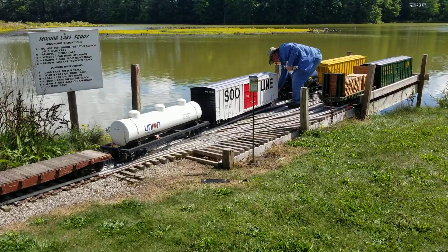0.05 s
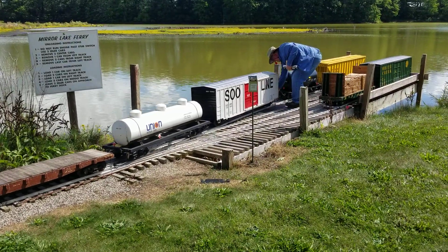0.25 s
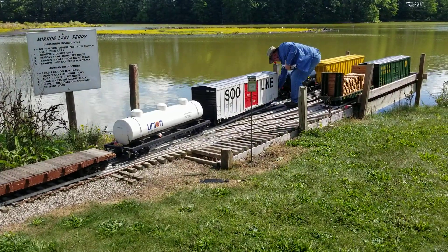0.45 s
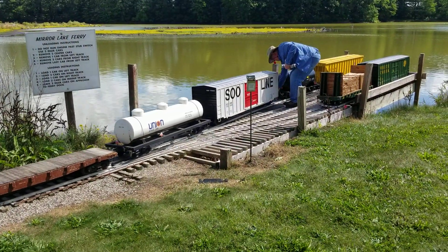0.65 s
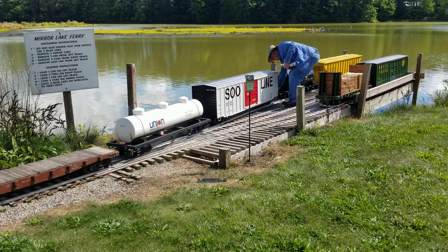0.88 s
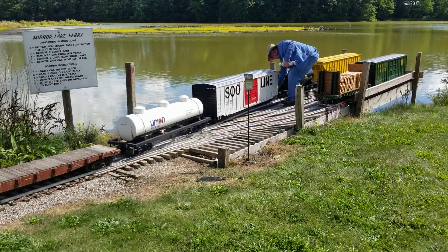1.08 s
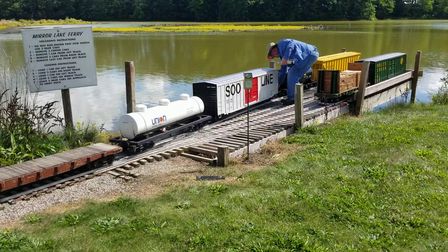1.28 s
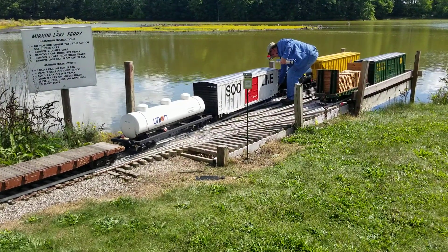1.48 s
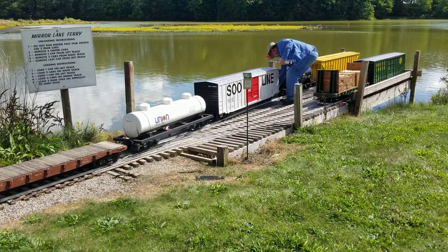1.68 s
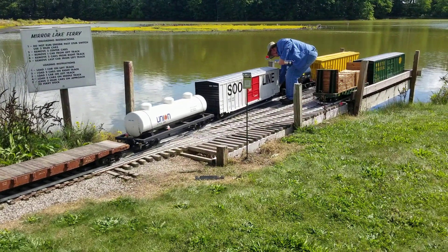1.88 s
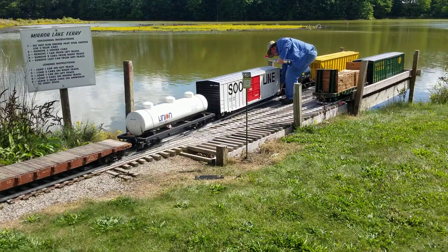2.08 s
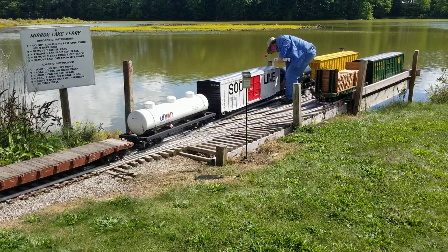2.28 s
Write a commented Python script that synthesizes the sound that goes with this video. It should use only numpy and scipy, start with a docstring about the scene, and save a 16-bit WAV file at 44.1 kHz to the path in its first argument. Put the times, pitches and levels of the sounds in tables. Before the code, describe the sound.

Miniature freight cars knock together in one sharp metallic clack at about 2.15 seconds, with a low thud, a brief steel ring and a short dull tail. Before that, light wind buffets the microphone, with low thumps on the left from 0.3 to 0.7 seconds, then weaker gusts. Leaves and grass rustle faintly throughout, and the creeping wheels grumble very quietly now and then.

```python
"""Miniature freight cars coupling by a lake

Two small cars knock together: a short crush of contacts rings their steel couplers and frames
and thuds through the bodies, with a dull tail off the banks. Their wheels grumble faintly.
A light breeze rustles the trees and grass, and its gusts buffet the two microphone ports."""
import sys
import numpy as np
from scipy import signal
from scipy.fft import rfft, irfft
from scipy.io import wavfile
from scipy.ndimage import uniform_filter1d

SR = 44100
rng = np.random.default_rng(int(sys.argv[2]) if len(sys.argv) > 2 else 0)


def to_wav(s):
    """Save 16-bit WAV."""
    ch = np.atleast_2d(s).T  # columns
    pcm = np.round(np.clip(ch, -1, 1) * 32767)  # PCM
    wavfile.write(sys.argv[1], SR, pcm.astype(np.int16))


N = 108045
T = np.arange(N) / SR
BIN_HZ = np.fft.rfftfreq(N, 1 / SR)
CUTOFF_HZ = 15900

# Stereo image of the open air: freq_hz, likeness (left to right, -1 to 1)
AIR_LIKENESS = [(300, 0.88), (700, 0.44), (1400, -0.47), (2800, 0.2), (6000, 0.026), (14000, -0.078)]


def crush():
    """Force between the cars: each contact hits at once and dies in a moment."""
    # The couplers close and settle: start_s, level_db
    contacts = [(2.1324, -17), (2.1391, -3.5), (2.1430, -4.5), (2.1490, 3.5), (2.1539, 4), (2.157, -4),
                (2.1637, -2), (2.1697, -8.5), (2.1830, -15), (2.253, -18.5), (2.311, -22)]
    decay_s = 0.00092
    return sum(from_db(db) * (T >= start_s) * np.exp(-np.minimum(np.abs(T - start_s) / decay_s, 20))
               for start_s, db in contacts)


def bodies(force):
    """The car bodies clatter in resonances too dense to tell apart; each band has its own decay."""
    # Tone of the clatter: freq_hz, relative_db
    spectrum = [(100, -11), (170, 19.5), (260, 5), (330, 3.5), (450, -22.5), (650, -8), (1000, -2),
                (1400, -11), (2000, 1.5), (3600, -3), (4200, -6.5), (4750, -13), (5500, -3), (6600, -10.5),
                (7500, -4.5), (8800, -20), (15000, -16)]
    # Its stereo image: freq_hz, likeness
    likeness = [(150, 0.98), (600, 0.94), (1400, 0.24), (3000, 0.16), (7000, 0.29), (14000, 0.81)]
    # Its ring time: centre_hz, t60_s
    decays = [(150, 0.11), (800, 0.27), (2500, .11), (6000, 0.14), (14000, 0.16)]
    centres_hz, t60s = np.transpose(decays)
    bands = split_bands(coloured(spectrum, likeness, low_hz=80), centres_hz)
    return from_db(-29.5) * sum(band * ringing(force, t60_s) for band, t60_s in zip(bands, t60s))


def thud():
    """The mass of the cars gives a low knock that swells and fades around the hardest contacts."""
    # The knock: peak_s, peak_db, pitch_hz
    knock = (2.1545, -27, 115)
    peak_s, peak_db, pitch_hz = knock
    return from_db(peak_db) * np.cos(2 * np.pi * pitch_hz * (T - peak_s)) * swell(peak_s, width_s=0.008)


def couplers(force):
    """The steel couplers ring on, high and bright."""
    # Coupler modes: pitch_hz, relative_db, t60_s
    modes = [(2890, -4, .13), (2916, -3, .15), (3803, -4, .13), (4244, -1, .17), (5098, -1, .14),
             (5222, -8, .14), (5883, -2, .09), (6471, -2, .19), (6610, -5, .14), (6815, -6, .11),
             (7378, -1, .13), (7600, -8, .12), (9215, -11, .14), (11455, -10, .15)]
    return from_db(-42.5) * steel(force, modes)


def frames(force):
    """The frames and wheels add a lower, mostly shorter clank."""
    # Frame and wheel modes: pitch_hz, relative_db, t60_s
    modes = [(630, -4.5, 0.29), (866, 3, 0.04), (1107, 0.5, 0.096), (1230, -12, 0.017), (1550, 1.5, 0.046),
             (1790, 2, 0.068), (1873, -2, 0.14), (2074, 1, 0.1), (2200, -15, 0.057), (2530, 1.5, 0.026),
             (2980, -9, 0.051), (3360, 1.5, 0.027), (3750, 1.5, 0.069), (6100, 5, 0.11)]
    return from_db(-42.5) * steel(force, modes)


def steel(force, modes, impacts_per_s=4800, spread_rad=0.97):
    """A grind of tiny impacts jolts each mode's phase while its level follows the energy fed in."""
    out = np.zeros((2, N))
    for pitch_hz, db, t60_s in modes:
        impacts = force * (rng.random(N) < impacts_per_s / SR) * rng.standard_normal(N)
        pole = from_db(-60 / (t60_s * SR)) * np.exp(2j * np.pi * pitch_hz / SR)
        phase = np.angle(signal.lfilter([1], [1, -pole], impacts + 1e-18))
        port_phase = spread_rad * rng.standard_normal((2, 1))
        out += from_db(db) * ringing(force, t60_s) * np.sin(phase + port_phase)
    return out


def banks(clack, t60_s=0.34, build_s=0.015):
    """The banks and trees scatter back a faint, dull tail."""
    # Tone of the tail: freq_hz, relative_db
    spectrum = [(200, 13), (700, -1), (2500, 4), (5000, 3), (10000, -28)]
    envelope = from_db(-60 * T / t60_s) * (1 - np.exp(-T / build_s))
    tail = coloured(spectrum, AIR_LIKENESS, low_hz=200) * envelope
    tail /= np.sqrt(np.sum(tail ** 2) / 2)
    return from_db(-18) * signal.fftconvolve(clack, tail, axes=1)[:, :N]


def wheels():
    """The creeping wheels grumble on the rails in short swells."""
    # Swells of rumble: peak_s, width_s, level_db
    rolls = [(0.168, 0.024, -52), (0.204, 0.012, -54), (0.24, .04, -58), (0.76, 0.062, -69),
             (1.25, 0.0094, -56), (1.556, 0.034, -58.5), (1.784, 0.024, -58.5), (2.258, 0.028, -53.5),
             (2.312, 0.003, -50)]
    # Tone of the rumble: freq_hz, relative_db
    spectrum = [(200, 2), (330, 3.5), (450, 1.5), (650, 4.5), (850, 0), (1150, -3.5), (1500, -8),
                (4000, -23.5)]
    level = sum(from_db(db) * swell(peak_s, width_s) for peak_s, width_s, db in rolls)
    return level * coloured(spectrum, AIR_LIKENESS, low_hz=150)


def wind(even_s=0.0325):
    """Lumpy low turbulence, separate on each port, rides the pressure of the gusts."""
    # Gusts on the left port: time_s, relative_db
    gusts_left = [(0, -42.5), (.21, -40.5), (.29, -34), (.36, -34.5), (.45, -24), (.49, -32.5),
                  (.55, -33.5), (.61, -34.5), (.70, -29), (.765, -35.5), (.79, -57), (.92, -73),
                  (1.04, -59.5), (1.14, -50), (1.19, -68), (1.37, -93), (1.43, -40.5), (1.49, -53.5),
                  (1.53, -41), (1.6, -36.5), (1.64, -91), (1.7, -45.5), (1.83, -75), (1.88, -45),
                  (1.96, -35), (2.03, -101), (2.09, -48), (2.2, -39), (2.27, -39), (2.32, -70),
                  (2.38, -40.5), (2.45, -48.5)]
    # Gusts on the right port: time_s, relative_db
    gusts_right = [(0, -41), (.1, -51), (.16, -40.5), (.31, -38), (.42, -54), (.58, -53), (.66, -43.5),
                   (.8, -57), (1.19, -58), (1.35, -46), (1.48, -50.5), (1.54, -33.5), (1.6, -49),
                   (1.65, -54.5), (1.7, -38), (1.83, -51.5), (1.9, -39.5), (1.95, -32), (2.02, -61),
                   (2.09, -42), (2.2, -41), (2.27, -44), (2.31, -45.5), (2.45, -46)]
    # Tone of the buffeting: freq_hz, relative_db
    spectrum = [(25, -2), (45, 4.5), (70, 7.5), (120, -1), (180, -9), (260, -17), (380, -30), (600, -53.5)]
    # The ports share almost nothing: freq_hz, likeness
    likeness = [(50, 0.011), (300, 0.006)]
    lumps = coloured(spectrum, likeness, low_hz=20.8)
    power = uniform_filter1d(lumps ** 2, int(even_s * SR))
    evened = lumps / np.sqrt(power + 0.044)  # compressed, so the gusts set the dynamics
    return evened * from_db([in_time(gusts_left) + 3, in_time(gusts_right) + 4])


def eddies(width_cycles=0.36):
    """Each strong eddy thumps the left port with one rounded swing of pressure."""
    # Thumps: peak_s, level_db, centre_hz
    thumps = [(0.299, -13.5, 64.4), (.408, -7.5, 130), (.426, -8.5, 179.6), (0.575, -12.5, 146),
              (0.587, -9, 72), (0.647, -12.5, 83), (.659, -13, 135)]
    out = np.zeros((2, N))
    for peak_s, db, centre_hz in thumps:
        cycles = np.clip((T - peak_s) * centre_hz, -20, 20)
        out[0] += from_db(db) * np.cos(2 * np.pi * cycles) / np.cosh(cycles / width_cycles)
    return signal.sosfilt(signal.butter(1, 15, "high", fs=SR, output="sos"), out)


def foliage(flickers_per_s=20):
    """Trees and grass rustle with the breeze, each band flickering on its own."""
    # Rise and fall of the rustle: time_s, level_db
    breeze = [(0, -50), (.15, -51.5), (.32, -49), (.45, -52.5), (.7, -54), (.92, -59), (1.2, -59.5),
              (1.32, -63), (1.55, -59.5), (1.7, -59.5), (1.85, -62), (1.95, -57), (2.1, -60.5),
              (2.3, -55.5), (2.45, -55.5)]
    # Tone of the leaves: freq_hz, relative_db
    spectrum = [(210, -6), (350, -8), (450, -14), (730, -9.5), (1300, -15), (2300, -12.5), (3800, -19.5),
                (4900, -24.5), (8000, -27.5), (9300, -39), (11000, -31), (12500, -24), (14000, -29.5),
                (15500, -42)]
    # Flicker, smoothest in the treble: centre_hz, depth_db
    flutter = [(300, 1.8), (700, 1.8), (1400, 1.5), (2800, 1.1), (5600, .3)]
    centres_hz, depths_db = np.transpose(flutter)
    bands = split_bands(coloured(spectrum, AIR_LIKENESS, low_hz=150), centres_hz)
    rustle = np.zeros((2, N))
    for band, depth_db in zip(bands, depths_db):
        flicker = np.interp(T * flickers_per_s, np.arange(N), rng.standard_normal(N))
        rustle += band * from_db(depth_db * flicker)
    return from_db(in_time(breeze)) * rustle


def far_hiss():
    """A steady bed of distant hiss."""
    # Tone of the bed: freq_hz, relative_db
    spectrum = [(50, -13), (110, 3), (200, 4), (400, -3), (520, -8), (700, -6), (1360, -8.5), (2300, -4.5),
                (3000, -12), (3750, -6), (5000, -10.5), (9400, -12.5), (12500, -12.5), (15500, -11)]
    return from_db(-58.5) * coloured(spectrum, AIR_LIKENESS, low_hz=121)


def from_db(db):
    """Decibels to gain."""
    return 10 ** (np.asarray(db) / 20)


def in_time(curve):
    """A time curve's value at every sample."""
    return np.interp(T, *np.transpose(curve))


def over_bins(freqs_hz, values):
    """A curve's value at every frequency bin, joined on a log axis."""
    return np.interp(np.log(BIN_HZ + 1e-3), np.log(freqs_hz), values)


def swell(peak_s, width_s):
    """A bell-shaped fade in and out; width_s is its standard deviation."""
    return np.exp(-0.5 * ((T - peak_s) / width_s) ** 2)


def ringing(force, t60_s):
    """Envelope of a resonance that gathers energy from the force and loses it again; peak 1."""
    retained = from_db(-60 / (t60_s * SR)) ** 2
    energy = signal.lfilter([1], [1, -retained], force ** 2 + 1e-18)
    return np.sqrt(energy / energy.max())


def coloured(spectrum, likeness, low_hz):
    """Stereo noise of a given tone and left-right likeness, rolled off below low_hz; rms 1."""
    mid, side = rfft(rng.standard_normal((2, N)))
    alike = np.clip(over_bins(*np.transpose(likeness)), -1, 1)
    stereo = np.sqrt(1 + alike) * mid + np.sqrt(1 - alike) * side * [[1], [-1]]
    tone = from_db(over_bins(*np.transpose(spectrum)))
    low_cut = BIN_HZ ** 2 / (BIN_HZ ** 2 + low_hz ** 2)
    noise = irfft(stereo * tone * low_cut * (BIN_HZ < CUTOFF_HZ), N)
    return noise / np.sqrt(np.mean(noise ** 2) + 1e-20)


def split_bands(sound, centres_hz):
    """Overlapping bands that add up to the whole sound."""
    bins = rfft(sound)
    return [irfft(bins * over_bins(centres_hz, share), N) for share in np.eye(len(centres_hz))]


def scene():
    """The clack, a little to the left, in the open air and the wind."""
    force = crush()
    left, right = couplers(force) + frames(force) + bodies(force) + thud()
    lag_samples = 2  # the clack reaches the right port just after the left
    late_right = np.pad(right, (lag_samples, 0), mode="edge")[:N]
    clack = np.array([left, late_right])
    return clack + banks(clack) + foliage() + far_hiss() + wheels() + wind() + eddies()


def record(dry):
    """A steep low-pass shaves off the very top."""
    return signal.sosfilt(signal.ellip(12, .1, 90, CUTOFF_HZ, fs=SR, output="sos"), dry)


dry = scene()
out = record(dry)
to_wav(out)
```